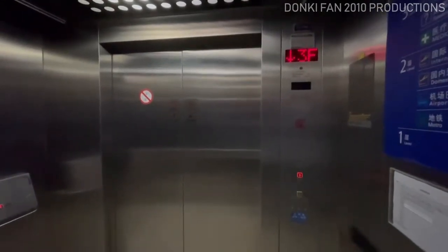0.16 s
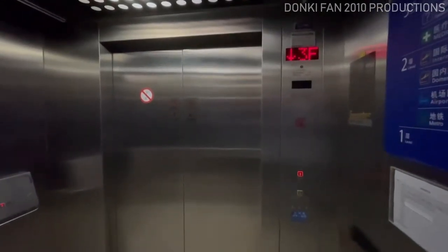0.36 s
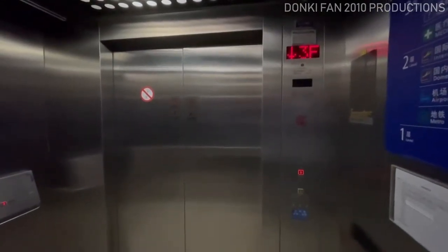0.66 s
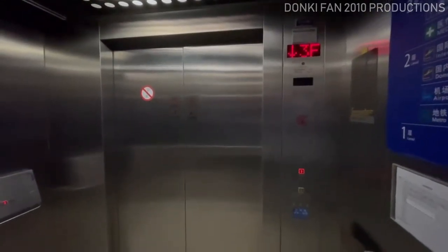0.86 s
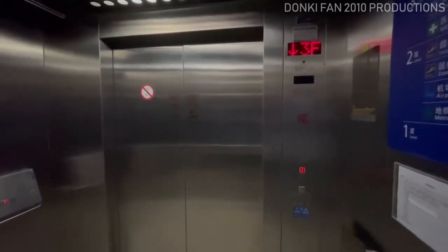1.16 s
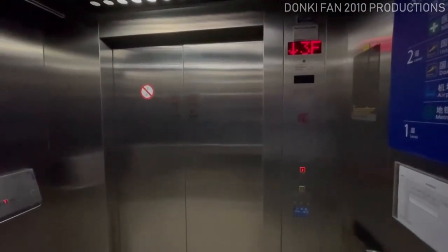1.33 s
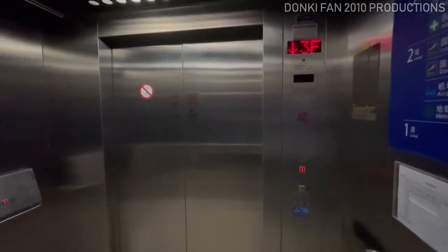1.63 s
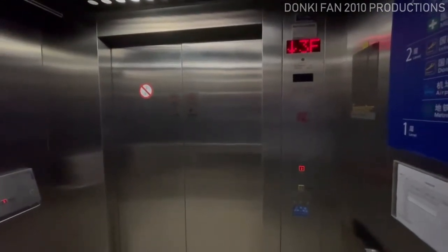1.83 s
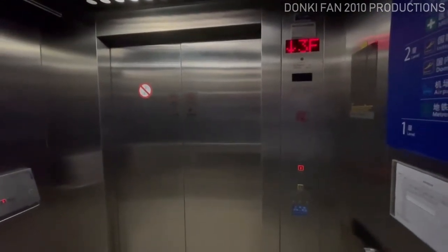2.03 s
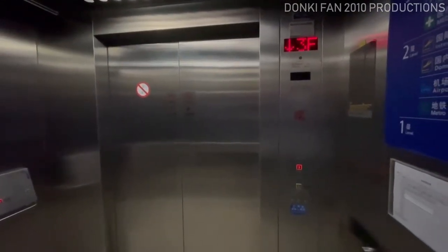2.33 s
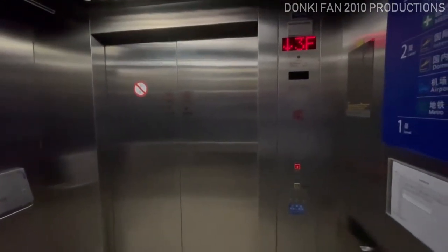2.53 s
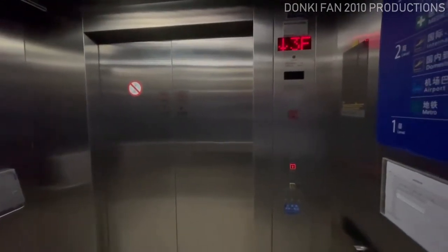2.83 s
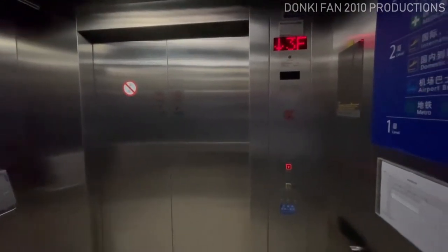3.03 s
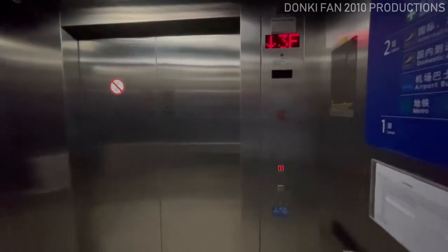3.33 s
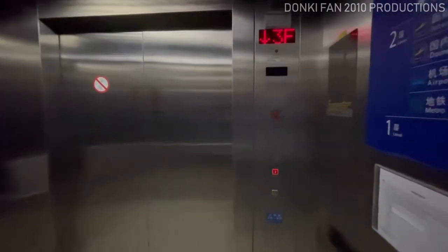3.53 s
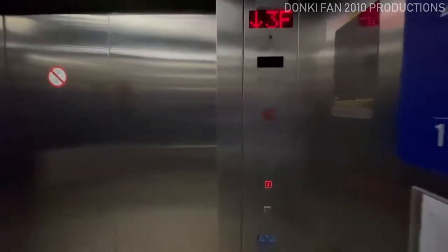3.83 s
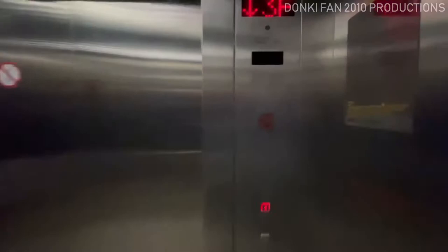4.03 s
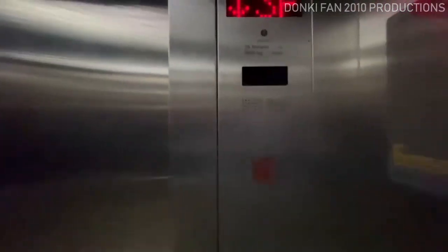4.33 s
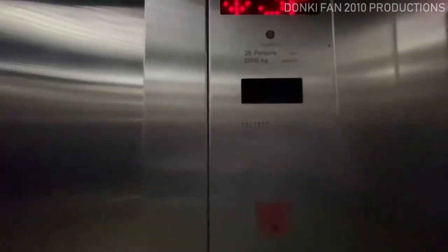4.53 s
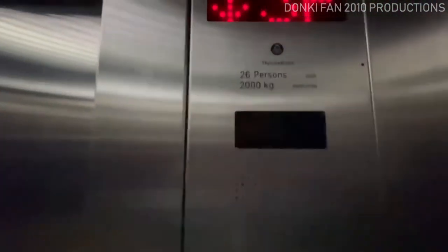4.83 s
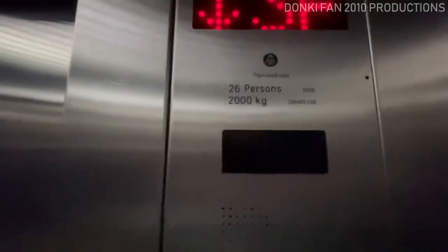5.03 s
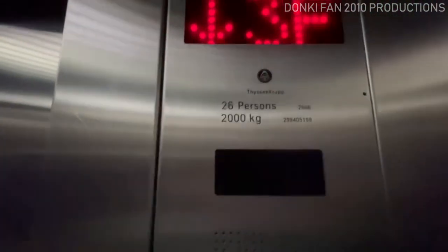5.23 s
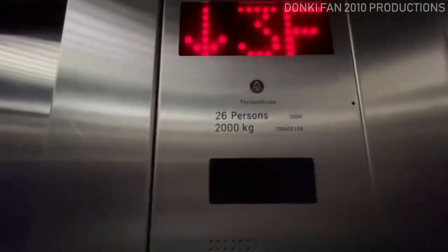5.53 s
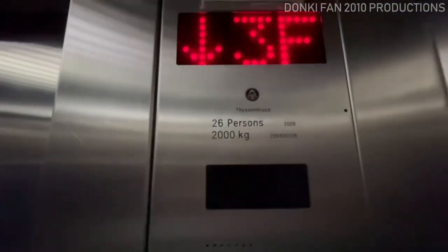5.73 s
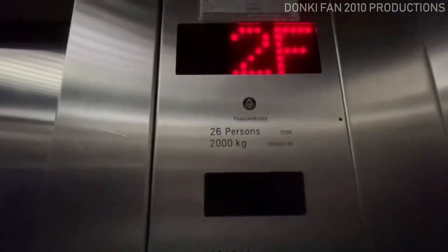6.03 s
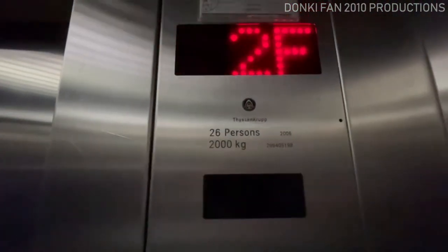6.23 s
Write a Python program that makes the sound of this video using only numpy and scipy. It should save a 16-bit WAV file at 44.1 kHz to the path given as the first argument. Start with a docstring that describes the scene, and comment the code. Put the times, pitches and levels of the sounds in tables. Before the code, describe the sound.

A passenger rides in a humming metal elevator cabin. The bed is deep rail rumble, a droning low tone that swells and dips, faint hollow cabin resonances and quiet air. At about three and a half seconds a shoe chirps faintly; two quick groups of muffled knocks on the floor plate follow, the second shaking the car, then a small scuff. The ride continues steadily to the end, heard in stereo from a moving handheld microphone.

```python
"""A ride down inside a closed steel lift car, heard by a passenger carrying a stereo pair to the panel.
From the start, shaped noise makes guide-rail rumble and ventilation, wavering tones ring as cabin modes,
and a mains hum with overtones swells and dips; clothes rustle now and then as grainy friction noise.
Past three seconds a sole squeaks as a falling whistle, then two groups of steps knock the floor plate.
The rumble shudders with the second group, a shoe scuffs as friction noise, and the rustling goes on."""
import sys
import numpy as np
from scipy import signal
from scipy.fft import rfft, irfft, next_fast_len
from scipy.io import wavfile
from scipy.ndimage import uniform_filter1d, map_coordinates

SR = 44100
rng = np.random.default_rng(int(sys.argv[2]) if len(sys.argv) > 2 else 0)


def persist_wave(psi):
    """Save psi, clipped to +-1, as 16-bit WAV."""
    counts = np.round(np.clip(psi, -1, 1) * 32767).astype(np.int16)
    wavfile.write(sys.argv[1], SR, np.atleast_2d(counts).T)


N = 281358
TIME = np.arange(N) / SR  # s
HALF = np.array([[.5], [-.5]])  # splits a left-right difference over the two channels

# The walk. Each row: time in seconds, share of the way from mid-cabin to the panel (0 to 1).
WALK_SHARE = [(0, 0.31), (3.4, 0.059), (5, 0.82), (6.38, 1)]

# Rail rumble colour. Each row: frequency in Hz, relative density in dB per Hz.
RUMBLE_COLOUR = [(12, -55), (22, -24), (40, -11.5), (64, -6.5), (80, 4), (100, -5.5), (115, -1), (130, -7),
                 (155, -7.5), (200, -17), (280, -26), (420, -62)]
# Boost of the deepest rumble. Each row: time in seconds, gain in dB.
DEEP_GAIN = [(0, 0), (2, -1), (3.2, 0), (4.1, 8), (4.7, 4.5), (5.2, 2), (6.38, 5)]
# Ventilation colour. Each row: frequency in Hz, relative density in dB per Hz.
AIR_COLOUR = [(120, -67), (200, -7), (300, -5), (420, -10), (690, -12), (900, -13.5), (1080, -17.5),
              (1450, -20.5), (1600, -21.5), (1720, -19.5), (1850, -23), (2050, -26.5), (2260, -25),
              (2380, -27.5), (2500, -25), (2650, -27), (3400, -37), (6800, -41), (9800, -39.5),
              (14500, -56.5)]
# Ventilation strength. Each row: time in seconds, level in dB.
AIR_LEVEL = [(0, -45), (.8, -44), (1.95, -44), (2.3, -45), (3.07, -44), (3.55, -44.5), (3.95, -42),
             (4.06, -42), (4.3, -43.5), (4.9, -43), (5.4, -43.5), (6.38, -44.5)]
RUMBLE_DB, BRIGHT_DB = (-39, -38.5), (-1, -3.5)  # rumble level, gain of the rush above 2 kHz: mid-cabin, panel
# the car shakes with the second group of steps
SHUDDER_S, SHUDDER_RISE_S, SHUDDER_HOLD_S, SHUDDER_FALL_S = 4.48, .03, .2, .12
SHUDDER_DB, SHUDDER_FROM_HZ = 10.5, 124

# Cabin modes, ringing tones that swell and fade, one just after a step. Each row: frequency in Hz,
# width in Hz, level in dB, strongest moment in seconds, spread of the swell in seconds.
CABIN_MODES = [(178, 8.9, -52, 4.6, 4.3), (225.7, 10, -53, 6, 1.7), (293, 3, -51, 4.2, 0.12),
               (303, 2.92, -48, 3.25, 0.2), (313, 5, -46, 1.85, 0.7), (331, 4.9, -56.5, 2.7, 0.27),
               (387.4, 11, -52.5, 2.04, 0.64), (392, 5.7, -42.5, 4.62, 0.045), (421.5, 6.2, -53, 1.44, 1.3),
               (459, 3.5, -52, 3.05, 0.38), (476.6, 3.2, -57.5, 1.7, 1.8), (587, 21, -65, 2.6, 3.2),
               (631, 38, -66, 1.9, 3.2), (906, 50, -59.5, 6, 0.33), (2240, 29, -70, 1.5, 2)]

HUM_HZ = 99.87  # twice the mains frequency
HUM_PAN_DB = (3.5, 3.5)  # left over right: mid-cabin, panel
# Hum strength along the standing wave. Each row: time in seconds, level in dB.
HUM_LEVEL = [(0, -33), (.7, -31.5), (1.22, -32), (1.45, -29), (2, -28), (2.7, -31.5), (3.14, -30),
             (3.52, -30.5), (3.75, -36.5), (3.89, -32), (4.1, -43.5), (4.23, -34), (4.48, -32.5),
             (4.56, -29), (4.62, -38.5), (4.78, -34.5), (4.97, -41.5), (5.19, -40.5), (5.38, -33.5),
             (5.51, -31), (5.62, -35), (5.92, -30.5), (6.38, -28.5)]
# Hum overtones. Each row: multiple of the hum, level in dB and left-channel phase lead in radians at mid-cabin,
# then level in dB and lead in radians at the panel.
HUM_OVERTONES = [(2, -76.5, .4, -47, .2), (3, -57.5, 2.5, -54.5, 0.26), (4, -56.5, 2.16, -52.5, 1.42),
                 (5, -67.5, 2.6, -78.5, 1.1), (6, -62, 4.2, -51.5, 2.9)]

# Friction colour. Each row: frequency in Hz, relative density in dB per Hz.
RUB_COLOUR = [(1000, -46), (1400, -16.5), (2200, -7.5), (4000, -11), (6000, -16), (9000, -7), (11000, -14),
              (13500, -13), (15500, -10.5)]
# Rubs of clothes and shoes. Each row: start of hold in seconds, hold in seconds, level in dB,
# coarseness (gain below 5 kHz) in dB.
RUB_STROKES = [(0, 0.024, -69, 17.5), (.63, 0.27, -64.5, 6.5), (1.32, 0.37, -70, 8),
               (3.15, 0.23, -62.5, 5.5), (3.5, .3, -67.5, 3.5), (3.9, 0.68, -59.5, 1.5),
               (4.857, 0.036, -44, -4), (4.96, 0.039, -60, 7), (5.04, 0.13, -64.5, 9), (5.3, 0.22, -69, 4),
               (5.42, 0.07, -74, 3), (5.6, .8, -68, 5)]
RISE_DB_PER_S, FALL_DB_PER_S = 130.5, 117

# Sole squeaks. Each row: start in seconds, length in seconds, first pitch in Hz, last pitch in Hz, level in dB.
SOLE_SQUEAKS = [(3.409, 0.038, 2590, 2440, -50.5)]

# Foot contacts. Each row: start in seconds, level in dB, thud over it in dB, heel tick over it in dB.
FOOT_CONTACTS = [(3.822, -46.5, -14, -28), (3.843, -38, -14.5, -33), (3.856, -37.5, -8, -30),
                 (3.878, -37.5, -8, -41), (3.897, -45.5, -12, -38), (3.927, -45.5, 15, -29),
                 (3.942, -44.5, 4.5, -14), (3.99, -40, -10, -17), (4.484, -42, -10, -9.5),
                 (4.492, -36.5, -1, -26), (4.507, -39, 9, -27), (4.519, -42, 7, -18),
                 (4.547, -45.5, 9, -20), (4.565, -48, 22, -26), (4.6, -46, 1, -28)]
# Floor plate modes. Each row: frequency in Hz, width in Hz, relative level in dB.
PLATE_MODES = [(173, 41, 1.5), (298, 76, 2.5), (403, 80, 0.5), (518, 145, 0.5), (642, 170, -0.5),
               (1130, 980, -15)]
# attacks are time constants, T60 is the time to fall by 60 dB
STEP_T60_S, STEP_ATTACK_S, STRIKE_DB = 0.14, 0.00035, 44  # the shaking plate; the first blow over it
THUD_HZ, THUD_T60_S, THUD_ATTACK_S = 103.4, 0.11, 0.0072  # the whole floor gives under the weight

# Stereo width of the noise. Each row: frequency in Hz, left-right likeness (1 same, -1 opposite).
LIKENESS = [(12, 0.95), (100, 1), (160, 1), (220, 0.39), (350, 0.38), (600, 0.17), (1500, -0.15),
            (3000, 0.19), (10800, -0.22), (11600, 0.56), (12000, 0.98)]
# Left-right balance of the whole sound. Each row: frequency in Hz, left over right in dB.
STEREO_TILT = [(60, -1.5), (180, -1.5), (550, 2.5), (1650, 1), (4970, 8.5), (9000, -1.5), (12000, -1)]
# Treble colour of the whole sound: narrow dips and peaks. Each row: frequency in Hz, gain in dB.
TREBLE_COLOUR = [(5000, 0.5), (5230, 5.5), (5360, -3.5), (5800, -1), (6050, 5), (7050, 2.5), (7300, -9),
                 (7800, -2), (8000, -1.5), (10000, -3), (10500, -13.5), (11500, -11), (13500, -9),
                 (15600, -17)]
TOP_HZ = 15612  # band limit


def amp(db):
    """Decibels to a linear factor."""
    return 10 ** (np.asarray(db) / 20)


def unit(x):
    """Scale to an rms of 1."""
    return x / np.sqrt(np.mean(x ** 2) + 1e-20)


def along(points, hz):
    """Read a curve of (Hz, value) points on a log frequency axis."""
    f, v = np.transpose(points)
    return np.interp(np.log(hz + 1), np.log(f + 1), v)


def curves(rows):
    """One value per sample for each column after the time."""
    s, *cols = np.transpose(rows)
    return [np.interp(TIME, s, c) for c in cols]


def wobble(rate):
    """A smooth random curve, rate knots a second."""
    knots = rng.standard_normal(int(N * rate / SR) + 4)
    return map_coordinates(knots, [TIME * rate])


def walking(middle, panel):
    """A value that moves between mid-cabin and the panel with the walk."""
    (walked,) = curves(WALK_SHARE)
    return middle + (panel - middle) * walked


def filtered(x, response):
    """Filter x by a complex response of frequency."""
    m = next_fast_len(N + SR // 2)  # room for the tail
    return irfft(rfft(x, m) * response(np.fft.rfftfreq(m, 1 / SR)), m)[..., :N]


def low_part(x, hz):
    """The part of x below a gentle, phase-free crossover."""
    return filtered(x, lambda f: 1 / (1 + (f / hz) ** 4))


def high_part(x, hz, power):
    """The part of x above a phase-free crossover; a higher power cuts more steeply."""
    return filtered(x, lambda f: 1 / (1 + (hz / (f + 1)) ** power))


def resonances(modes):
    """Response of a set of damped modes with alternating signs."""
    def response(f):
        total = 0
        for k, (centre, width, db) in enumerate(modes):
            damping = 1j * f * width
            total = total + (-1) ** k * amp(db) * damping / (centre * centre - f * f + damping)
        return total
    return response


def diffuse(response, patchy_db=0, envelope=1):
    """Stereo noise whose width follows LIKENESS: wide in the middle, almost mono at the very top."""
    z = signal.stft(rng.standard_normal((2, N)), nperseg=512)[2]
    patches = rng.standard_normal(z.shape[1:])
    patches = uniform_filter1d(uniform_filter1d(patches, 5, 0), 16, 1)
    patchy = z * amp(patchy_db * unit(patches))
    pair = unit(signal.istft(patchy, nperseg=512)[1][:, :N])

    def colour(hz):
        # the likeness sets how the power divides between mid and side
        turn = np.arccos(np.clip(along(LIKENESS, hz), -1, 1)) / 2
        return response(hz) * np.array([np.cos(turn), np.sin(turn)])

    # the mid has an rms of 1 before the envelope
    mid_response = colour(np.arange(0, SR / 2, .5))[0]
    scale = np.sqrt(np.mean(np.abs(mid_response) ** 2))
    mid, side = filtered(pair * envelope / scale, colour)
    return np.array([mid + side, mid - side])


def comb(x, depth_db):
    """Dense upper cabin modes: narrow peaks and dips in each channel that shift slowly."""
    z = signal.stft(x, nperseg=4096)[2]
    field = uniform_filter1d(uniform_filter1d(rng.standard_normal(z.shape), 3, 1), 24, 2)
    gain = amp(depth_db * unit(field))
    return signal.istft(z * unit(gain), nperseg=4096)[1][:, :N]


def rail_rumble():
    """Guide rails shake the car as low noise; its depth shifts, and a shudder lifts all but the lowest part."""
    level_db = walking(*RUMBLE_DB) + 0.43 * wobble(3.2) + 0.59 * wobble(5)
    rumble = amp(level_db) * diffuse(lambda hz: amp(along(RUMBLE_COLOUR, hz)), patchy_db=0.6)
    (deep_db,) = curves(DEEP_GAIN)
    shudder_times = SHUDDER_S + np.cumsum([0, SHUDDER_RISE_S, SHUDDER_HOLD_S, SHUDDER_FALL_S])
    shudder = np.interp(TIME, shudder_times, [0, 1, .8, 0])
    deep = low_part(rumble, 60)
    upper = high_part(rumble, SHUDDER_FROM_HZ, 8)
    return rumble + (amp(deep_db) - 1) * deep + (amp(SHUDDER_DB * shudder) - 1) * upper


def ventilation():
    """Moving air rushes as broad noise whose treble changes with the walk."""
    (level_db,) = curves(AIR_LEVEL)
    colour = lambda hz: amp(along(AIR_COLOUR, hz))
    air = amp(level_db + 0.3 * wobble(4.05)) * diffuse(colour, patchy_db=1.44)
    treble = high_part(air, 2000, 4)
    return air + (amp(walking(*BRIGHT_DB)) - 1) * treble


def cabin_modes():
    """Each mode is a wavering tone with narrow noise around it, out of step between left and right."""
    out = np.zeros((2, N))
    for hz, width, db, strongest, spread in CABIN_MODES:
        phase = 2 * np.pi * hz * TIME + HALF * hz / 500
        swell = amp(db) * np.exp(-.5 * ((TIME - strongest) / spread) ** 2)
        steady = (1 + .28 * wobble(width)) * np.cos(phase)
        noisy = .3 * wobble(width) * np.sin(phase)
        out += swell * (steady + noisy)
    return out


def hum():
    """Twice the mains frequency stands in the cabin, with a few wavering overtones locked to it."""
    (level_db,) = curves(HUM_LEVEL)
    phase = 2 * np.pi * HUM_HZ * TIME + 0.16 * wobble(7)
    pan_db = HALF * walking(*HUM_PAN_DB)
    tone = amp(level_db + 0.77 * wobble(14) + pan_db) * np.sin(phase)
    for multiple, middle_db, middle_lead, panel_db, panel_lead in HUM_OVERTONES:
        db = walking(middle_db, panel_db) + 3 * wobble(3.5)
        lead = HALF * walking(middle_lead, panel_lead)
        tone += amp(db) * np.sin(multiple * phase + lead)
    return np.sqrt(2) * tone  # levels are rms


def rubbing():
    """Cloth and shoe friction in uneven grains; rubs rise, hold and fall, coarser ones fuller below 5 kHz."""
    start, held, db, coarse_db = np.transpose(RUB_STROKES)[..., None]
    rise = RISE_DB_PER_S * np.maximum(start - TIME, 0)
    fall = FALL_DB_PER_S * np.maximum(TIME - start - held, 0)
    strokes = amp(db - rise - fall)
    level = strokes.sum(axis=0) + 1e-12
    coarse = (amp(coarse_db) * strokes).sum(axis=0) / level
    grains = level * amp(1.2 * wobble(45))
    rub = diffuse(lambda hz: amp(along(RUB_COLOUR, hz)), 2.9, grains)
    return rub + (coarse - 1) * low_part(rub, 5000)


def squeaks():
    """A rubber sole slips: a short falling whistle, a little stronger on the left."""
    out = np.zeros(N)
    for start, length, from_hz, to_hz, db in SOLE_SQUEAKS:
        u = np.clip((TIME - start) / length, 0, 1)
        glide = from_hz + (to_hz - from_hz) * u * u * (3 - 2 * u)
        swell = np.sqrt(np.abs(np.sin(np.pi * u))) * (u < 1)
        out += amp(db) * swell * np.sin(2 * np.pi * np.cumsum(glide) / SR)
    return out * amp([[1.2], [-1.2]])


def steps():
    """Each contact strikes and shakes the floor plate: a low thud, the plate's modes and a tick of the heel."""
    body, thud, tick, strikes = np.zeros((4, N))
    for start, db, thud_db, tick_db in FOOT_CONTACTS:
        t = np.maximum(TIME - start, 0)
        blow = amp(db - 60 * t / STEP_T60_S) * (1 - np.exp(-t / STEP_ATTACK_S))
        body += blow
        tick += amp(tick_db) * blow
        sway = amp(db + thud_db - 60 * t / THUD_T60_S) * (1 - np.exp(-t / THUD_ATTACK_S))
        thud += sway * np.sin(2 * np.pi * THUD_HZ * t)
        strikes[round(start * SR)] = amp(db + STRIKE_DB)
    # a rubber sole dulls the blow
    plate = lambda f: resonances(PLATE_MODES)(f) / (1 + 1j * f / 1800) ** 2
    heel = lambda f: resonances([(2900, 2600, 0)])(f) ** 2 / (1 + (f / 4600) ** 6)
    ringing = filtered(strikes, plate) + diffuse(plate, envelope=body)
    return ringing + thud + diffuse(heel, envelope=tick)


def scene():
    """Everything heard in the car, from the bed of the ride to the footsteps."""
    travel = comb(rail_rumble() + ventilation(), depth_db=2.5)
    return travel + cabin_modes() + hum() + rubbing() + squeaks() + steps()


def record(dry):
    """Left and right differ in tilt, the sound has an uneven treble and nothing passes above the band limit."""
    def response(hz):
        gain_db = along(TREBLE_COLOUR, hz) + along(STEREO_TILT, hz) * HALF
        return amp(gain_db) * (hz < TOP_HZ)
    return filtered(dry, response)


dry = scene()
out = record(dry)
persist_wave(out)
```